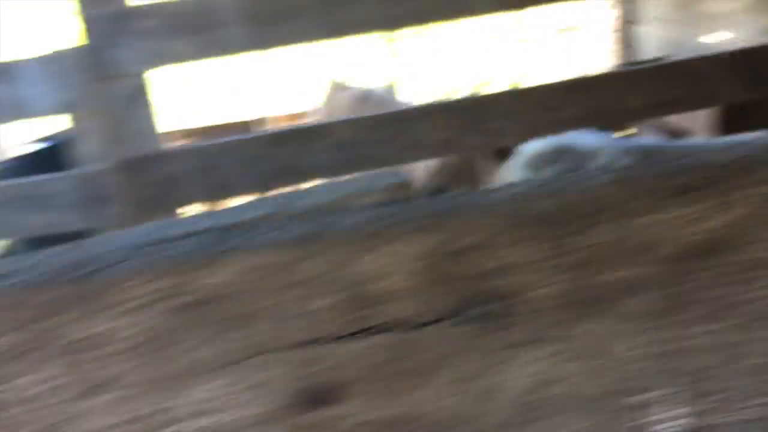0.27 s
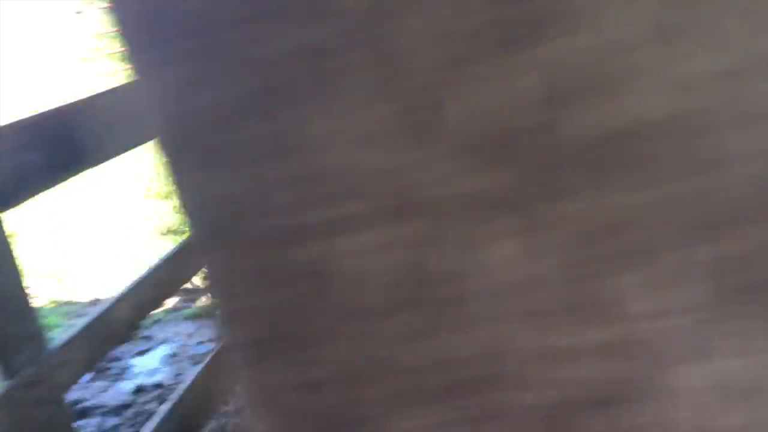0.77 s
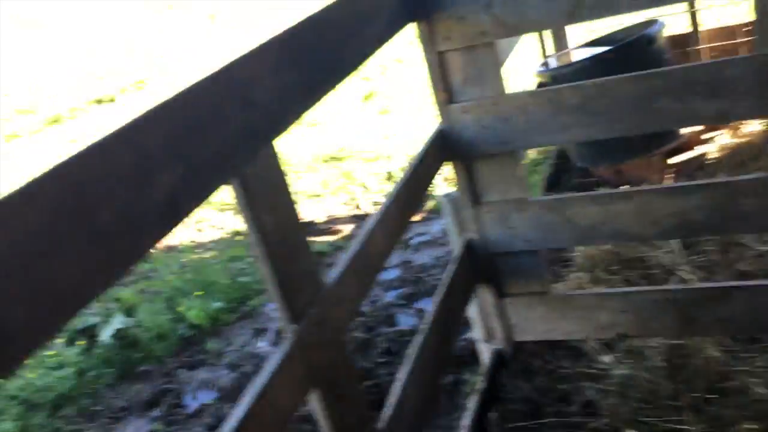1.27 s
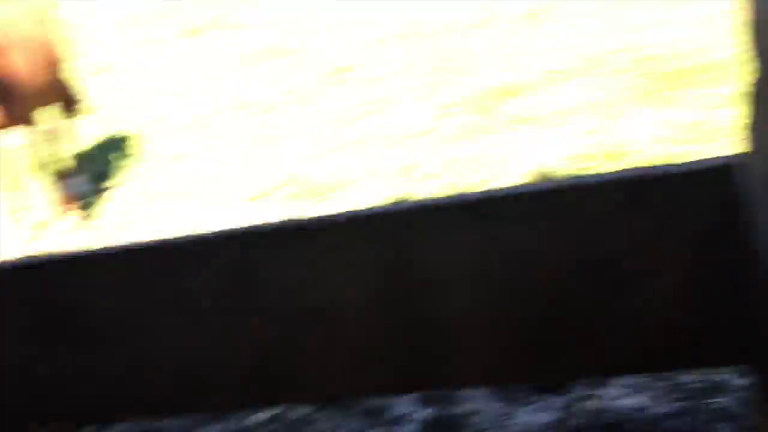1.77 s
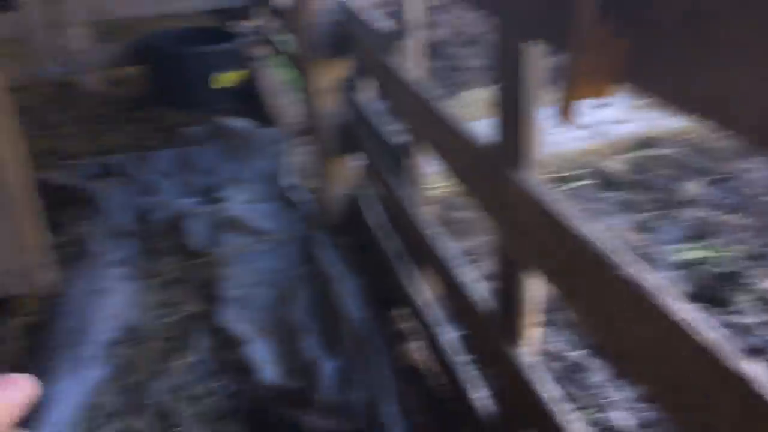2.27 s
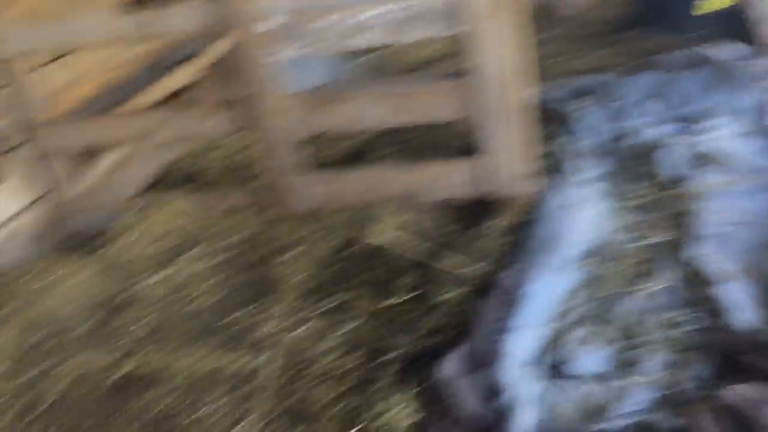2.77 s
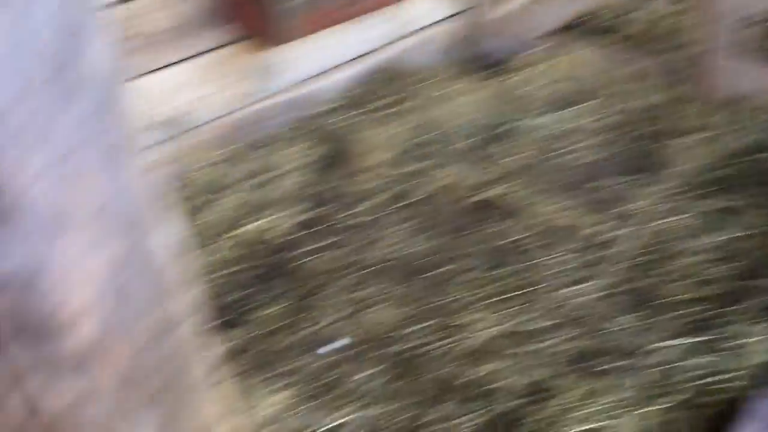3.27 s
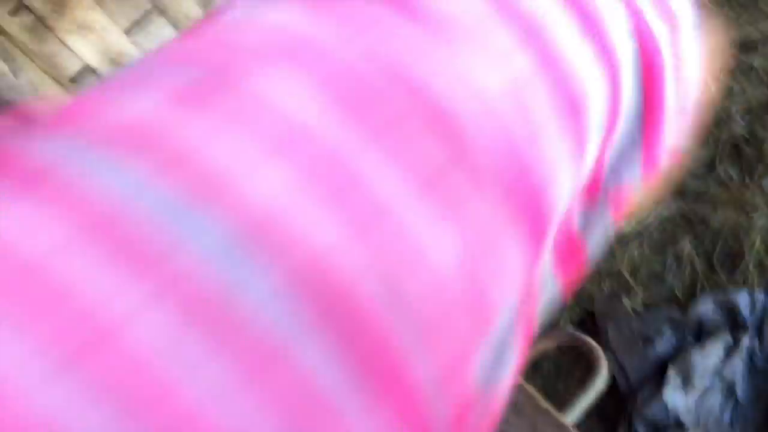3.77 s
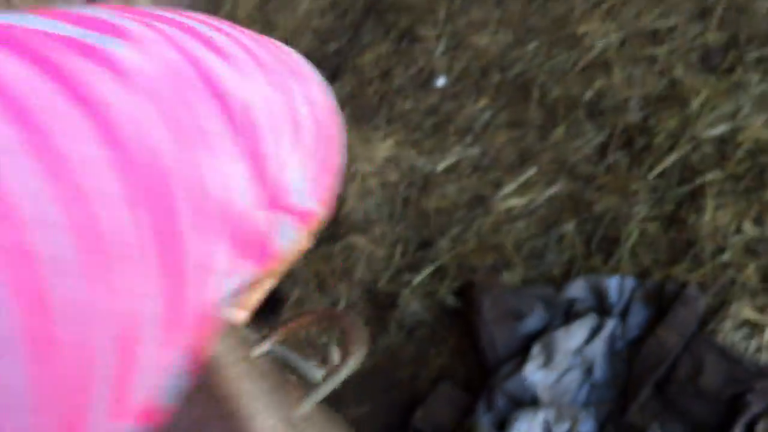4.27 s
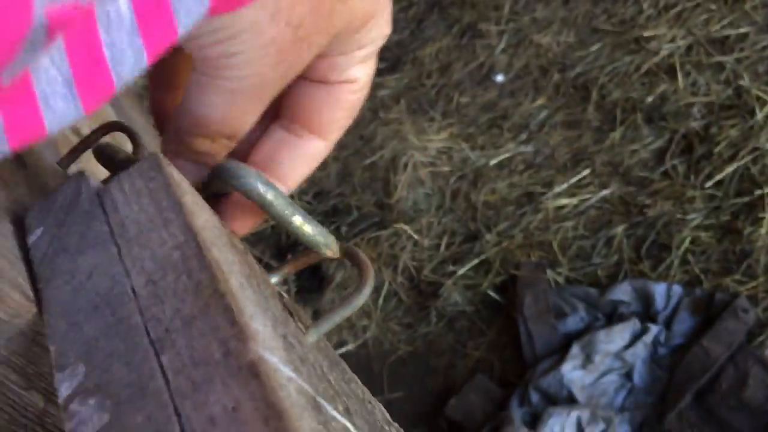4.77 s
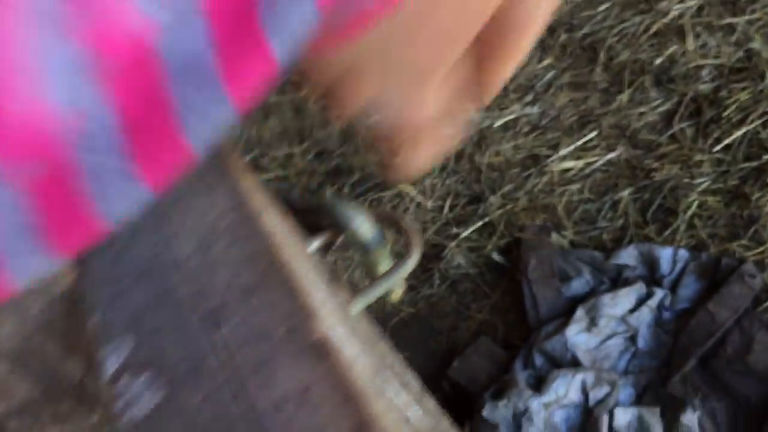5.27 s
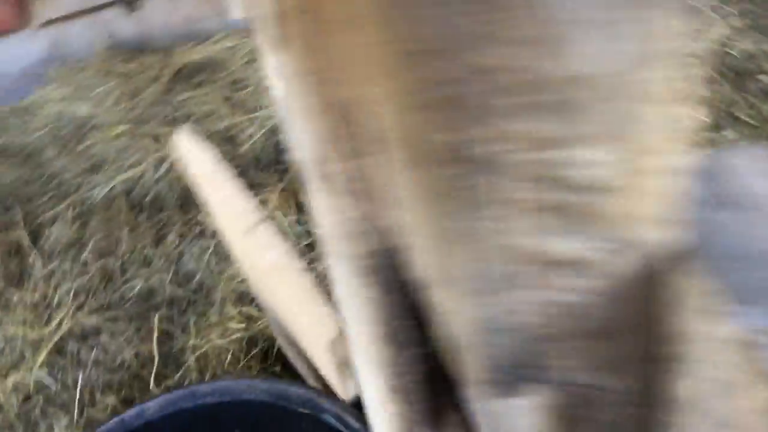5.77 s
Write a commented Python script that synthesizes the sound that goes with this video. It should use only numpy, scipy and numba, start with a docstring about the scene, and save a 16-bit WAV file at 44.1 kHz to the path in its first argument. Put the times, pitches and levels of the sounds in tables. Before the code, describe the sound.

Someone walks through rustling hay beside wooden pens, boots scuffing and clothes lightly brushing boards. After an early rattling rail knock come faint taps, then four hollow gate thuds, bright wooden raps, and hard steel latch clacks with a short thin ring. The sound is close and dry over faint barn air, and the hand bumps and rumbles on the camera microphone.

```python
"""Feet rustle through hay and a hand rumbles on the camera while the loose rails of a barn gate knock.
The heavy gate then thuds against its post, and a steel hook snaps into its eye and rings.
Struck wood and steel are a noise crack, decaying modes and a diffuse tail (modal synthesis).
Hay, cloth and scraping steel are runs of random tiny contacts; hand and barn air are filtered noise."""
import sys
import numpy as np
from scipy import signal
from scipy.fft import rfft, irfft, next_fast_len
from scipy.io import wavfile
from scipy.ndimage import uniform_filter1d
from numba import njit

SR = 44100
rng = np.random.default_rng(int(sys.argv[2]) if len(sys.argv) > 2 else 0)


def generate_wav(sig):
    """Save sig (samples, or channels by samples) to the path in sys.argv[1] as 16-bit PCM at SR."""
    pcm = np.round(np.clip(np.atleast_2d(sig).T, -1, 1) * 32767).astype(np.int16)
    wavfile.write(sys.argv[1], SR, pcm)


N = 266099
TIME = np.arange(N) / SR  # s
AGE = np.arange(SR) / SR  # s since a blow


def undb(db):
    """Level to amplitude: 20 dB is a factor of ten."""
    return 10 ** (np.asarray(db) / 20)


def unit(x):
    """Normalisation to an rms of 1."""
    return x / np.sqrt(np.mean(x ** 2))


def unit_attack(x, size=1323):
    """Normalisation of a transient: rms 1 over its first 30 ms."""
    return x / np.sqrt(np.mean(x[:size] ** 2))


def fade(t60):
    """Exponential decay: the amplitude falls by 60 dB in t60 seconds."""
    return np.exp(-np.log(1000) * AGE / t60)


def colour(x, points, tilt_db=0):
    """Minimum-phase filtering through (hz, db) points, tilted in dB per octave about 1024 Hz."""
    n = next_fast_len(len(x) + 4096, True)
    octave = np.log2(np.maximum(np.arange(n // 2 + 1) * SR / n, 10))
    hz, db = np.transpose(points)
    level_db = np.interp(octave, np.log2(hz), db) + tilt_db * (octave - 10)
    # folding the cepstrum onto positive time makes the response causal
    cepstrum = irfft(np.log(undb(level_db)), n)
    cepstrum[1:n // 2] *= 2
    cepstrum[n // 2 + 1:] = 0
    return irfft(rfft(x, n) * np.exp(rfft(cepstrum)), n)[:len(x)]


def band(x, hz, skirt_db):
    """Broad resonance: down by the skirt level two octaves to each side."""
    return colour(x, [(hz / 4, skirt_db), (hz, 0), (hz * 4, skirt_db), (hz * 16, 2 * skirt_db)])


@njit
def resonate(x, hz, width):
    """State-variable resonance: a band-pass with a moving centre, its width a share of the centre."""
    y, band_state, low_state = np.empty(len(x)), 0., 0.
    for i in range(len(x)):
        g = np.tan(np.pi * hz[i] / SR)
        v = (band_state + g * (x[i] - low_state)) / (1 + g * (g + width))
        band_state = 2 * v - band_state
        low_state = low_state + 2 * g * v
        y[i] = v
    return y


def add(out, s, x):
    """Superposition: mix a sound in at a time in seconds."""
    i = max(int(s * SR), 0)
    out[i:i + len(x)] += x[:N - i]


def walk(rate):
    """Slow random modulation of rms 1, drawn anew `rate` times per second and smoothed."""
    k = int(SR / rate)
    held = np.repeat(rng.standard_normal(N // k + 1), k)
    return unit(uniform_filter1d(uniform_filter1d(held, k), k)[:N])


def press(s, length, attack_s, release_s):
    """Contact envelope: pressure builds linearly, holds and lets go exponentially."""
    rise = np.clip((TIME - s) / attack_s, 0, 1)
    return rise * np.exp(-np.maximum(TIME - s - length, 0) / release_s)


def stalks(rate, spread_db):
    """Granular friction: random tiny snaps of uneven size over a soft rub of equal rms."""
    size = undb(spread_db * np.minimum(rng.exponential(size=N), 4))
    snaps = (rng.random(N) < rate / SR) * rng.uniform(-0.83, 1, N) * size
    return unit(unit(snaps) + rng.standard_normal(N))


def ticks(table, skirt_db):
    """Short impacts: decaying noise bursts, each around its own pitch."""
    out = np.zeros(N)
    for start_s, level_db, pitch_hz, t60_s in table:
        burst = rng.standard_normal(SR) * fade(t60_s)
        add(out, start_s, undb(level_db) * unit_attack(band(burst, pitch_hz, skirt_db)))
    return out


def struck_at(modes, place):
    """Modal excitation: mode levels for a blow between two places (0 to 1) on a part."""
    return [(hz, np.interp(place, [0, 1], [first_db, second_db]), t60)
            for hz, first_db, second_db, t60 in modes]


def ring(modes, length, tilt_db):
    """Modal decay: damped sines, weighted a little differently because every blow lands elsewhere."""
    hz, db, t60 = np.transpose(modes)
    weight_db = db + rng.standard_normal(len(hz)) + tilt_db * np.log2(hz / 1000)
    gain = undb(weight_db) * rng.choice([-1, 1], len(hz))
    return unit_attack(sum(g * fade(t * length) * np.sin(2 * np.pi * f * AGE)
                           for f, g, t in zip(hz, gain, t60)))


def tail(t60, damping):
    """Diffuse decay of joined boards and the barn: t60 is for 1 kHz, and higher octaves die sooner."""
    noise = rfft(rng.standard_normal(SR))
    octave = np.log2(np.clip(np.arange(len(noise)), 62.5, 16000) / 1000)  # bins are 1 Hz apart
    bands = [irfft(noise * np.maximum(1 - abs(octave - k), 0), SR) * fade(t60 * 2 ** (-damping * k))
             for k in range(-4, 5)]
    return unit_attack(sum(bands))


def blows(table, modes, shade, crack_t60, crack_db, tail_t60, damping, modes_db):
    """Impact response: a short crack, the modes of the struck part and a diffuse tail."""
    out = np.zeros(N)
    for start_s, level_db, tilt_db, length, smear_s in table:
        crack = unit_attack(colour(rng.standard_normal(SR) * fade(crack_t60), shade, tilt_db))
        diffuse = unit_attack(colour(tail(tail_t60 * length, damping), shade, tilt_db))
        blow = undb(crack_db) * crack + diffuse + undb(modes_db) * ring(modes, length, tilt_db)
        # a glancing contact takes a moment to build up
        contact = np.minimum(AGE / smear_s, 1)
        add(out, start_s, undb(level_db) * unit_attack(blow * contact))
    return out


# spectrum of the barn air: frequency_hz [Hz], density_db [dB per Hz]
BARN_AIR_SPECTRUM = [(18, -48), (30, -15), (64, 6), (252, 7.5), (437, -3), (2410, -9.5), (5040, -34),
                     (6720, -30), (10500, -57), (13300, -23), (16000, -43)]


def barn_air():
    """Stationary background noise: the quiet air of the barn, wavering slowly by about 1 dB."""
    return unit(colour(rng.standard_normal(N), BARN_AIR_SPECTRUM)) * undb(-52 + walk(1.34))


# feet moving through hay: start_s [s], length_s [s], shuffle_db and straw_db [dB before the trims in hay()]
FOOTSTEPS = [(0, 0.017, -41.5, -59), (0.304, 0.24, -46, -52.5), (0.572, 0.41, -50.5, -61),
             (0.828, 0.21, -45, -52), (1.047, 0.26, -53, -62), (1.236, 0.16, -46, -60.5),
             (1.695, 0.18, -46.5, -54.5), (1.884, 0.31, -44, -50.5), (2.34, 0.32, -52.5, -50.5),
             (2.441, 0.12, -54, -43.5), (2.65, 0.21, -51, -53.5), (2.843, 0.34, -47, -48.5),
             (3.39, 0.42, -53, -54), (3.81, 0.39, -57, -56.5), (4.401, 0.31, -53.5, -58),
             (4.922, 0.029, -37, -39), (5.072, 0.29, -54, -52), (5.368, 0.12, -46.5, -41.5),
             (5.49, 0.62, -51.5, -51.5), (5.758, 0.17, -47.5, -48)]
STEP_ATTACK_S, STEP_RELEASE_S = 0.056, 0.044  # the foot settles; the hay springs back (time constant)
STIR_SHUFFLE_DB, STIR_STRAW_DB = -60.5, -65  # faint stirring between steps, before the same trims


def footwork():
    """Addition of powers: shuffle and straw levels in dB, the steps over a faint stirring."""
    power = undb([[STIR_SHUFFLE_DB], [STIR_STRAW_DB]]) ** 2
    for start_s, length_s, shuffle_db, straw_db in FOOTSTEPS:
        foot = press(start_s, length_s, STEP_ATTACK_S, STEP_RELEASE_S)
        power = power + (undb([[shuffle_db], [straw_db]]) * foot) ** 2
    return 10 * np.log10(power)


PATCHY_DB, PATCHY_RATE = 0.95, 20  # rms swell in dB; changes per s


def patchy(x):
    """Independent band modulation: every half octave swells and sinks on its own."""
    n = next_fast_len(N, True)
    spectrum = rfft(x, n)
    half_octave = 2 * np.log2(np.clip(np.arange(len(spectrum)) * SR / n, 500, 16000) / 500)
    out = np.zeros(N)
    for k in range(11):
        part = irfft(spectrum * np.maximum(1 - abs(half_octave - k), 0), n)[:N]
        out += part * undb(PATCHY_DB * walk(PATCHY_RATE))
    return unit(out)


# boots scuffing in hay: start_s [s], length_s [s, nominal], level_db [dB]
BOOT_SCUFFS = [(0.455, 0.079, -40), (0.83, 0.21, -36.5), (2.472, 0.032, -57)]
# spectra of pressed hay and of dry straw: frequency_hz [Hz], density_db [dB per Hz]
SHUFFLE_SPECTRUM = [(88, -23.5), (150, -12), (385, -12), (428, -20.5), (640, -13), (819, -20.5),
                    (1210, -16), (4910, -28), (6000, -28), (7800, -33), (13200, -120)]
STRAW_SPECTRUM = [(1500, -36), (3000, -4.5), (5800, -0.5), (8000, 0.5), (10000, -0.5), (12500, -1),
                  (16000, -7)]


def hay(shuffle_db, straw_db):
    """Granular friction: boots press the hay with a dull shuffle; dry stalks hiss and crackle."""
    shuffle = patchy(colour(stalks(rate=2500, spread_db=2.0), SHUFFLE_SPECTRUM))
    shuffle *= undb(shuffle_db + 1.2 * walk(25.22) - 1.0)
    straw = patchy(colour(stalks(rate=1900, spread_db=2), STRAW_SPECTRUM))
    straw *= undb(straw_db + 0.91 * walk(40) - 4)
    # a sliding sole catches at once and lets go slowly; a faint rub remains outside each slide
    slide = sum(undb(level_db) * np.interp(TIME, [s, s + 0.019, s + 0.48 * length, s + 1.2 * length],
                                           [0.016, 1, 0.75, 0.046])
                for s, length, level_db in BOOT_SCUFFS)
    scuff_spectrum = [(100, -8.0), (500, 7.0), (1800, -2), (4000, -7.0), (8000, -14.5), (16000, -23)]
    scuff = unit(colour(stalks(rate=1300, spread_db=4.5), scuff_spectrum))
    return shuffle + straw + slide * scuff


# single stalks snapping underfoot: start_s [s], level_db [dB], pitch_hz [Hz], t60_s [s]
SNAPPED_STALKS = [(2.473, -53, 820, 0.034), (2.686, -53.5, 3400, 0.023)]


def snapping_stalks():
    """Brittle fracture: each stalk gives one short, broadly pitched tick."""
    return ticks(SNAPPED_STALKS, skirt_db=-26)


# clothes along the boards: start_s [s], length_s [s], level_db [dB], first_hz [Hz], last_hz [Hz],
# width [share of the pitch]
CLOTH_BRUSHES = [(0.241, .02, -58, 4020, 4120, .06), (1.268, .1, -54, 2300, 3840, 0.47),
                 (1.38, 0.066, -56.5, 4270, 2670, .16), (1.832, 0.21, -52, 2280, 2870, 0.5),
                 (2.082, 0.1, -56, 3770, 2780, 0.42), (5.525, 0.25, -54, 1640, 1720, 0.74),
                 (5.814, 0.088, -49, 5260, 5460, 1.1)]
BRUSH_ATTACK_S, BRUSH_RELEASE_S = 0.018, 0.023


def clothes():
    """Friction noise: cloth catches on rough wood in small slips; the pitch glides with its speed."""
    out = np.zeros(N)
    for start_s, length_s, level_db, first_hz, last_hz, width in CLOTH_BRUSHES:
        hz = np.interp(TIME, [start_s, start_s + length_s + BRUSH_RELEASE_S], [first_hz, last_hz])
        slips = resonate(resonate(stalks(rate=700, spread_db=2.0), hz, width), hz, width)
        stroke = press(start_s, length_s, BRUSH_ATTACK_S, BRUSH_RELEASE_S)
        out += undb(level_db) * stroke * unit(slips)
    return out


# the hand on the camera: time_s [s], rumble_db [dB before the trim in handling()]
GRIP_LEVELS = [(0, -48.5), (2.85, -55), (3.3, -37), (3.75, -35), (4.0, -45), (4.1, -39), (4.55, -33),
               (4.8, -32), (5.03, -23), (5.17, -33), (5.45, -25.5), (5.58, -39.5), (5.8, -29), (6.03, -22)]
JOLT_DB, JOLT_ATTACK_S, JOLT_DECAY_S = -2, 0.035, 0.039  # dB relative to the thud, before the same trim
GRIP_WAVER_DB, GRIP_WAVER_RATE = 4, 18  # rms unsteadiness of the hold in dB; changes per s


def grip():
    """Addition of powers: rumble level in dB of an unsteady hold, jolted at each thud of the gate."""
    hold = undb(np.interp(TIME, *np.transpose(GRIP_LEVELS)) + GRIP_WAVER_DB * walk(GRIP_WAVER_RATE))
    jolts = sum(undb(level_db + JOLT_DB) * press(start_s, JOLT_ATTACK_S, JOLT_ATTACK_S, JOLT_DECAY_S)
                for start_s, level_db, *_ in GATE_THUDS)
    return 20 * np.log10(np.hypot(hold, jolts))


# fingers bumping the camera: start_s [s], level_db [dB], pitch_hz [Hz], t60_s [s]
FINGER_BUMPS = [(.36, -45.5, 180, .15), (.985, -44, 66, 0.12), (1.16, -43, 60, 0.18),
                (2.951, -32, 63, 0.14), (4.269, -34.5, 78, 0.26), (4.682, -29.5, 86, 0.17),
                (4.847, -29, 153, 0.019), (4.891, -33, 113, 0.056), (4.931, -36, 228, 0.097),
                (4.952, -23.5, 57.7, 0.085), (5.042, -25.5, 102.4, 0.13), (5.249, -30.5, 66.5, 0.19),
                (5.38, -33, 159, 0.063), (5.69, -25.5, 51.4, 0.19)]
# spectrum of the shifting grip: frequency_hz [Hz], density_db [dB per Hz]
RUMBLE_SPECTRUM = [(20, -25), (35, -10), (52, 3.5), (90, -3), (160, -8), (250, -33.5), (500, -31.5),
                   (1500, -67)]


def handling(rumble_db):
    """Structure-borne sound: the grip on the camera body gives a low rumble and soft damped bumps."""
    out = unit(colour(rng.standard_normal(N), RUMBLE_SPECTRUM)) * undb(rumble_db - 5.5)
    soft_onset = 1 - fade(0.024)
    for start_s, level_db, pitch_hz, t60_s in FINGER_BUMPS:
        bump = np.sin(2 * np.pi * pitch_hz * AGE) * fade(t60_s) * soft_onset
        add(out, start_s, undb(level_db) * unit_attack(bump))
    return out


# steel sliding on steel: start_s [s], length_s [s], level_db [dB], brightness [dB per octave]
STEEL_SCRAPES = [(4.129, 0.024, -46, 0), (4.507, 0.033, -31, -4.5), (5.18, 0.016, -41, -2),
                 (5.187, 0.018, -30.5, -1.5)]
# spectrum of the chatter: frequency_hz [Hz], density_db [dB per Hz]
SCRAPE_SPECTRUM = [(100, -30), (400, -4), (620, 12), (800, -1.5), (1080, 3), (1400, 3), (1900, 8),
                   (2900, -5), (4200, -15), (4800, -27), (6300, -6), (7600, -15), (8700, -10), (10500, -31),
                   (12400, -11), (13500, -37), (16000, -32)]


def scrapes():
    """Stick-slip friction: the hook chatters over the eye in a rough run of tiny contacts."""
    out = np.zeros(N)
    for start_s, length_s, level_db, tilt_db in STEEL_SCRAPES:
        chatter = unit(colour(stalks(rate=460, spread_db=3.5), SCRAPE_SPECTRUM, tilt_db))
        out += undb(level_db) * press(start_s, length_s, attack_s=0.011, release_s=0.018) * chatter
    return out


# the free hook ringing: start_s [s], level_db [dB], ring_length [factor], place [0 shank - 1 tip]
HOOK_CHINKS = [(.364, -46.5, 1.25, .12), (5.161, -25, 1.08, 1)]
# modes of the hook: frequency_hz [Hz], shank_db [dB], tip_db [dB], t60_s [s, before the ring length factor]
STEEL_HOOK_MODES = [(6614, 0, -1, .32), (7295, -13, -1, .32), (10592, -40, -1, .2), (11351, -11, 0, .19),
                    (12105, -35, 0, .18), (12320, -40, -5, .14), (12560, -40, -3, .06)]


def hook():
    """Free vibration of a bar: the steel hook rings thinly after it is shaken or dropped."""
    out = np.zeros(N)
    for start_s, level_db, length, place in HOOK_CHINKS:
        add(out, start_s, undb(level_db) * ring(struck_at(STEEL_HOOK_MODES, place), length, 0))
    return out


# hard edges meeting: start_s [s], level_db [dB], pitch_hz [Hz], t60_s [s]
EDGE_CRACKS = [(.3455, -52, 3600, 0.054), (.385, -50, 3840, 0.03), (3.1635, -26.5, 1980, 0.066),
               (3.3665, -58, 2230, 0.02), (3.5305, -40.5, 2240, 0.022), (4.131, -30, 2440, 0.01),
               (4.3585, -50, 3080, 0.047)]


def edge_cracks():
    """Hard contact: meeting edges give short dry cracks around a pitch."""
    return ticks(EDGE_CRACKS, skirt_db=-51)


# loose rails knocking: start_s [s], level_db [dB], brightness [dB per octave], smear_s [s],
# rebound_loss_db [dB per rebound]
RAIL_KNOCKS = [(0.108, -45, -3, 0.0025, 30), (0.3456, -22, 0, 0.002, 4.5), (0.702, -38.5, -1, 0.0093, 26),
               (0.777, -36, 0.5, 0.0027, 19), (1.462, -33, 5.5, 0.015, 5), (1.785, -44.5, 2, 0.022, 9),
               (2.0, -45, -0.5, 0.018, 8), (2.607, -37, -0.5, 0.0043, 9), (2.926, -33.5, .5, 0.0036, 9.5),
               (3.2444, -35, 1, .0008, 6.5), (3.742, -42.5, -2.5, .0015, 18), (4.358, -33, 0, 0.0023, 9.5),
               (4.425, -46, -9, 0.0064, 22), (5.167, -26, 6, 0.0029, 13), (5.206, -28, 0.5, 0.0021, 11)]
# time between rebounds, build-up time of each rebound, ring length factor
REBOUND_S, REBOUND_SMEAR_S, RAIL_RING = .019, 0.0033, 0.76


def rattle(count=2):
    """Inelastic rebound: a loose rail strikes again after each knock, weaker every time."""
    return [(start_s + k * REBOUND_S, level_db - k * loss_db, tilt_db, RAIL_RING,
             REBOUND_SMEAR_S if k else smear_s)
            for start_s, level_db, tilt_db, smear_s, loss_db in RAIL_KNOCKS for k in range(count + 1)]


# modes of a rail: frequency_hz [Hz], level_db [dB], t60_s [s, before the ring length factor]
LOOSE_RAIL_MODES = [(418, -15, .17), (560, -15, .19), (770, -6, .12), (865, -3, .12), (1140, -4, .14),
                    (1345, -2, .17), (1385, -3, .17), (1575, -2, .13), (1790, -2.5, .14), (2090, -13, .13)]
# spectrum of a knock: frequency_hz [Hz], density_db [dB per Hz]
RAIL_SPECTRUM = [(40, -30), (150, -8), (250, -8), (400, -4), (620, -6), (850, 0.5), (1450, -3.5),
                 (1850, -4), (2350, -11.5), (4500, -34.5), (8000, -45), (16000, -72)]


def loose_rails():
    """Modal impact on light wood: the rails knock and rebound."""
    return blows(rattle(), LOOSE_RAIL_MODES, RAIL_SPECTRUM, crack_t60=.025, crack_db=2,
                 tail_t60=.2, damping=.25, modes_db=2)


# the board that carries the eye knocking: two bright raps near the eye, then a woody knock towards
# the board's edge: start_s [s], level_db [dB], brightness [dB per octave], ring_length [factor],
# smear_s [s], place [0 at the eye - 1 board edge]
BOARD_KNOCKS = [(4.131, -24.5, 1, 0.6, 0.000097, 0.46), (4.1352, -17.5, -2, 1.12, 0.00085, 0.092),
                (4.2325, -20.5, -3, 1.08, 0.0011, 0.89)]
# modes of the board that carries the eye: frequency_hz [Hz], eye_db [dB], edge_db [dB],
# t60_s [s, before the ring length factor]
EYE_BOARD_MODES = [(560, -20, -5, .22), (711, -11, -5, .14), (958, 5, -4, .075), (1168, -12, -2, .12),
                   (1389, -12, -1, .15), (1459, -11, -1, .14), (1701, 1, -12, .2), (1790, -7, 3, .06),
                   (2622, -7, -22, .12), (3381, -18, -26, .15), (5006, -20, -42, .22),
                   (5970, -24, -40, .11), (6966, -25, -40, .11)]
# spectrum of a knock on that board: frequency_hz [Hz], density_db [dB per Hz]
BOARD_SPECTRUM = [(40, -59), (250, -34), (500, -2.5), (950, 2), (1900, 5.5), (2700, -4), (3800, -16),
                  (6000, -29), (8800, -28), (11000, -44), (16000, -58)]


def eye_board():
    """Position-dependent excitation: the place of each knock sets the balance of the board's modes."""
    return sum(blows([knock], struck_at(EYE_BOARD_MODES, place), BOARD_SPECTRUM, crack_t60=.008,
                     crack_db=8, tail_t60=.18, damping=.2, modes_db=7.5)
               for *knock, place in BOARD_KNOCKS)


# the hook striking eye and board: start_s [s], level_db [dB], brightness [dB per octave],
# ring_length [factor], smear_s [s]
HOOK_SNAPS = [(4.615, -15.5, -1.5, 0.64, 0.000067), (4.686, -36.5, -8, 0.34, 0.0066),
              (4.942, -22.5, 1.5, 0.51, 0.00041), (5.1605, -16.5, 0.2, 0.35, 0.0024),
              (5.184, -30.5, -0.5, 0.51, 0.0014), (5.1955, -22.5, 1, 0.59, 0.0015),
              (5.215, -27.5, -1.5, 0.64, 0.0045)]
# modes of the struck eye: frequency_hz [Hz], level_db [dB], t60_s [s, before the ring length factor]
STEEL_EYE_MODES = [(618, -10, .55), (1020, -1, .14), (1207, -3, .17), (1357, -5, .14), (1723, -7, .1),
                   (2250, -6, .08), (2600, -3, .1), (3437, -6, .14), (4050, 1, .1), (4168, 2, .11),
                   (5346, -2, .07), (5740, -3, .07), (15040, -18, .28)]
# spectrum of a snap: frequency_hz [Hz], density_db [dB per Hz]
EYE_SPECTRUM = [(50, -40), (300, -20.5), (600, -8.5), (1000, -0.5), (1600, -10.5), (2500, 1.5),
                (3200, -5.5), (4200, -4), (6300, 0), (7500, -10.5), (8700, -8.5), (12500, -26),
                (16000, -25)]


def latch():
    """Modal impact on steel: the hook drops home with a strong crack and a ring."""
    return blows(HOOK_SNAPS, STEEL_EYE_MODES, EYE_SPECTRUM, crack_t60=0.0092, crack_db=13.5,
                 tail_t60=0.48, damping=0.58, modes_db=7.5)


# the gate bumping its post: start_s [s], level_db [dB], brightness [dB per octave],
# ring_length [factor], smear_s [s]
GATE_THUDS = [(3.164, -17, 2.5, 1.15, 0.0035), (3.367, -23, -0.5, 0.97, 0.004),
              (3.53, -20.5, -0.5, 1.37, 0.0029), (3.797, -24, -2, 1.27, 0.0026),
              (4.718, -32, -1.5, 1.1, 0.0015), (4.974, -29.5, -1.5, 0.81, 0.0072)]
# modes of the frame: frequency_hz [Hz], level_db [dB], t60_s [s, before the ring length factor]
GATE_FRAME_MODES = [(149, -4.5, 0.79), (199.5, 1, 0.16), (308.4, 11, 0.078), (368, 4.5, 0.23),
                    (464, 2.5, 0.26), (649.6, 4, 0.17), (671, -24, 0.074), (940, -3.5, 0.24),
                    (1228, 2, 0.072), (1485, 3.5, 0.052), (1680, -9, 0.09), (2200, -24, 0.014)]
# spectrum of a thud: frequency_hz [Hz], density_db [dB per Hz]
GATE_SPECTRUM = [(30, -14), (70, -21.5), (170, -4), (330, 1), (700, -0.5), (1200, -7.5), (1700, -13.5),
                 (2050, -8), (2400, -16), (2650, -23), (6000, -40), (16000, -56)]


def gate_frame():
    """Modal impact on a heavy frame: low wooden modes thud against the post."""
    return blows(GATE_THUDS, GATE_FRAME_MODES, GATE_SPECTRUM, crack_t60=0.0092, crack_db=6.0,
                 tail_t60=0.18, damping=0.62, modes_db=1.5)


def scene():
    """Superposition: barn air, the person, then the steel and wood of the gate."""
    person = hay(*footwork()) + snapping_stalks() + clothes() + handling(grip())
    steel = scrapes() + hook() + latch()
    wood = edge_cracks() + loose_rails() + eye_board() + gate_frame()
    return (barn_air() + person + steel + wood)[None]


def record(dry):
    """Overload and band limiting: the camera clips peaks beyond full scale and cuts the top at 16.4 kHz."""
    low_pass = signal.ellip(8, .2, 70, 16400, fs=SR, output="sos")
    return signal.sosfilt(low_pass, np.clip(dry, -1, 1))


dry = scene()
out = record(dry)
generate_wav(out)
```